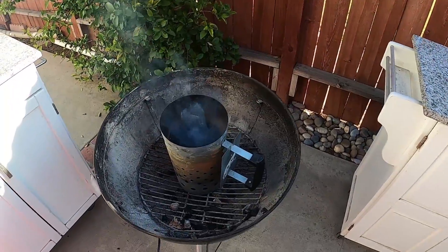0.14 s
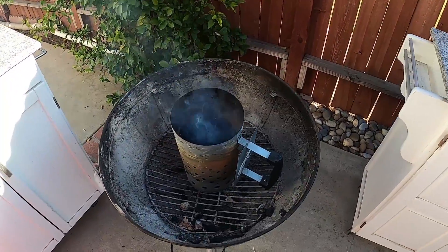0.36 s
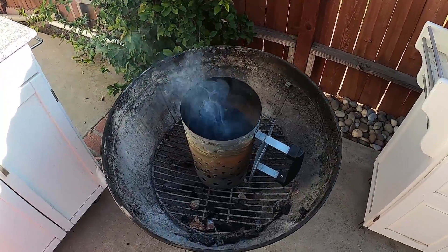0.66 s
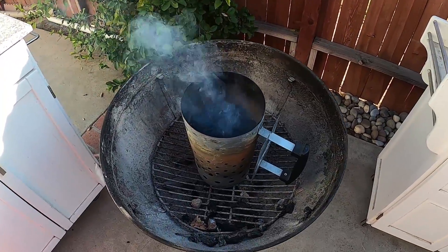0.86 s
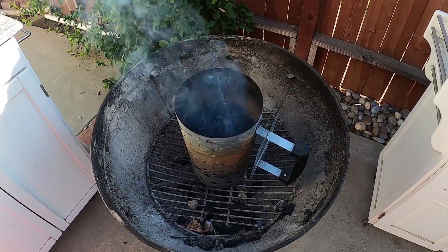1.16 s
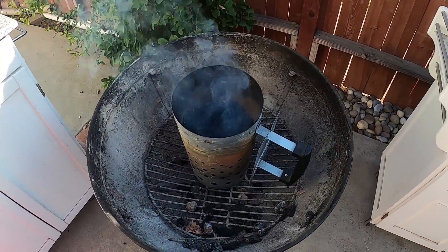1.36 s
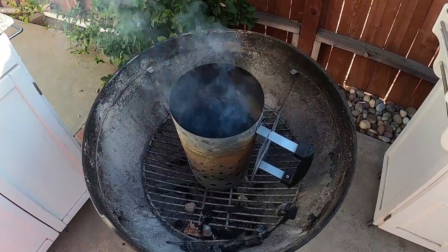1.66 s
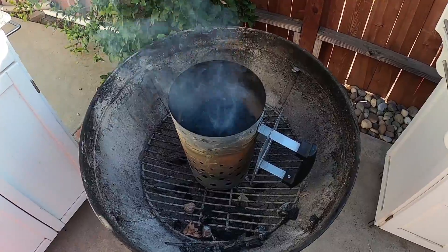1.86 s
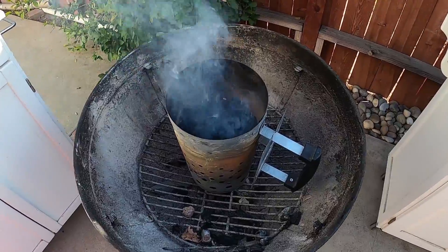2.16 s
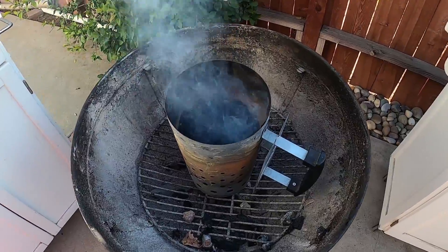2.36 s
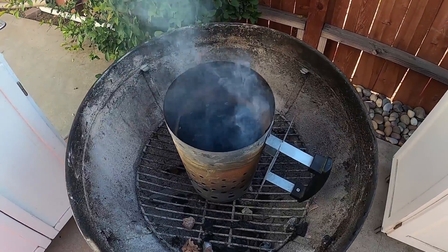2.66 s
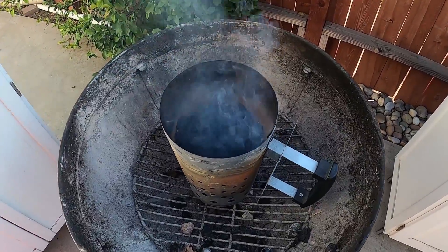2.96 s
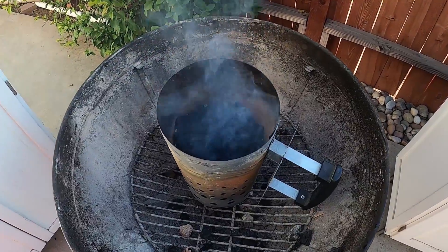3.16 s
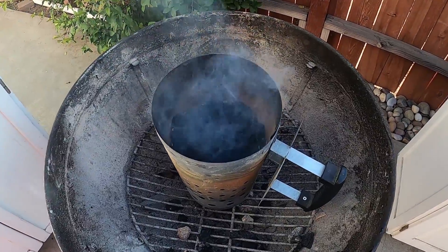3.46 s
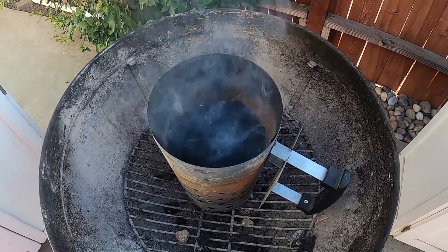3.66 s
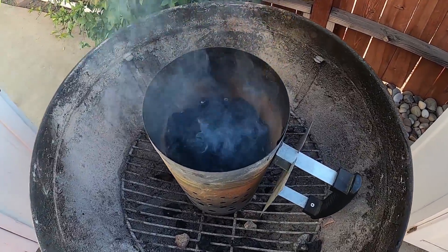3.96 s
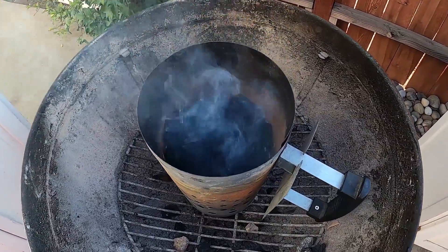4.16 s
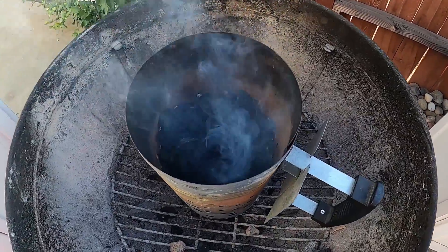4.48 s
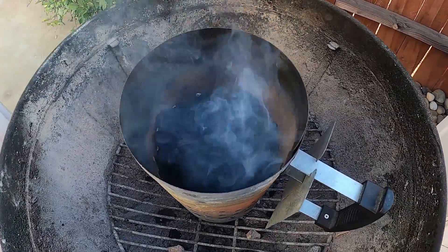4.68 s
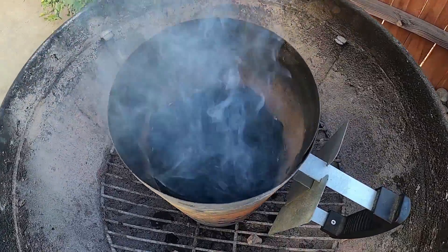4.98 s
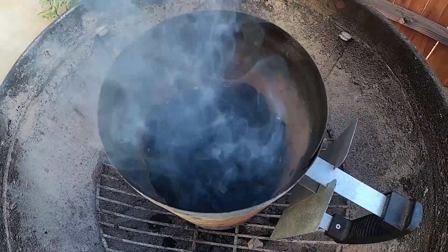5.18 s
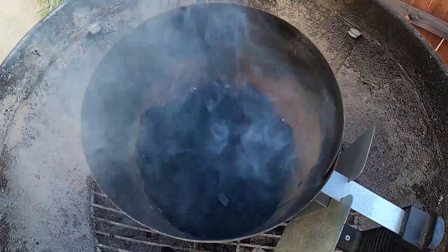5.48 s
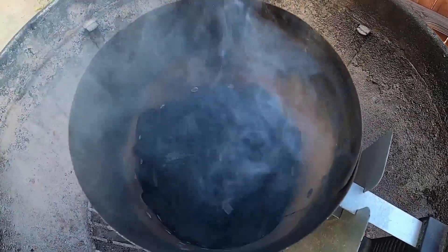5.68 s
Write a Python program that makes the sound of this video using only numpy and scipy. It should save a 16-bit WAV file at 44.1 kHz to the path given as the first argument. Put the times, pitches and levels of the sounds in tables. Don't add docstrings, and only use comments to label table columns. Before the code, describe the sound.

Outdoors on a small patio, a handheld stereo microphone approaches charcoal catching in a thin metal chimney. A steady low rumble lies underneath, with a deep distant machine hum of about 83 hertz that wavers, swelling around 2 seconds and again near 5.2. Far traffic is faint and fading. At 0 to 0.5 seconds shoe soles scrape, with a small knock. Sparse dry ticks follow, then the loudest snap, sharp and bright with a short metallic ring, at 1.3. Irregular cracks continue, clustering around 2.2 to 2.5, 3.0 to 3.8 and 4.4, among tiny ticks and faint fizz. Sliding lumps add gritty, tinny rattles, more noticeable after 4.2. A dull low tap at 4.7 and a harder one at 4.86 sound close by. More snaps come near 5.2, a grip click at 5.47 and a ringing slip at 5.7, as the soft air rush and fizz grow nearer.

```python
import sys
import numpy as np
from scipy import signal
from scipy.fft import rfft, irfft, next_fast_len
from scipy.io import wavfile
from scipy.ndimage import uniform_filter1d, map_coordinates

SR = 44100
rng = np.random.default_rng(int(sys.argv[2]) if len(sys.argv) > 2 else 0)


def to_wav(s):
    ch = np.atleast_2d(s).T
    pcm = np.round(np.clip(ch, -1, 1) * 32767)
    wavfile.write(sys.argv[1], SR, pcm.astype(np.int16))


def field_ratio(decibels):
    return 10 ** (np.asarray(decibels, dtype=float) / 20)


N = 257103

# (time [s], level [dB])
SHAFT_LEVEL = [(0, -39.5), (.9, -31), (1.5, -28.5), (2, -25), (2.6, -32.5), (3.5, -32), (4.3, -37),
               (4.7, -31), (5.2, -28.5), (5.83, -33.5)]
# (time [s], frequency [Hz])
SHAFT_PITCH = [(0, 82.3), (1.8, 82.8), (2.8, 83.44), (5.83, 84.01)]
# (time [s], shaft octave level [dB], slower machine's octave level [dB])
OCTAVE_LEVELS = [(0, -68, -52), (.9, -50.5, -54), (1.5, -44, -47.5), (2.1, -44.5, -53.5), (2.7, -46.5, -59),
                 (3.3, -60.5, -56.5), (5.83, -74, -52)]
# (silent beat [s], beat rate [1/s], loudest time [s], level [dB], fall [dB/s^2])
SLOWER_MACHINE = [
    (.59, 2.95, 0.46, -37.5, 7.5),
    (4.331, 5.15, 4.47, -38, 11),
]
# (frequency [Hz], level [dB], loudest time [s])
UPPER_LINES = [(377.4, -61, 3.04), (411, -69, 1.3), (464, -62.5, 5.4)]

# (frequency [Hz], density [dB per Hz])
RUMBLE_SPECTRUM = [(12, -45.5), (22, -6.5), (40, -1.5), (62, -2.5), (110, -4.5), (150, -8), (230, -15),
                   (270, -30.5), (400, -58.5)]
TRAFFIC_SPECTRUM = [(170, -30), (260, -2.5), (320, -2), (420, -5.5), (700, -13), (900, -29), (2000, -58)]
DRAUGHT_SPECTRUM = [(300, -36.5), (480, 7.5), (620, -1), (900, -0.5), (1300, -1), (1900, -11.5),
                    (2800, -24.5), (5000, -45.5)]
FIZZ_SPECTRUM = [(1200, -40), (2500, -6.5), (3700, -7), (5000, -3.5), (6500, -6), (7800, -4), (9200, -9.5),
                 (10500, -19.5), (13000, -59)]
# (frequency [Hz], correlation [0-1])
PORT_LIKENESS = [(30, 0.8), (70, 1), (240, 0.96), (490, 0.88), (990, 0.65), (1980, 0.3), (3990, 0.17),
                 (8040, 0.97)]
# (time [s], closeness [dB])
CLOSENESS = [
    (0, 0),
    (2.18, -3),
    (4.3, -0.5),
    (5.1, 4.5),
    (5.83, 7),
]
RUMBLE_DB, TRAFFIC_DB, DRAUGHT_DB, FIZZ_DB = -45, -53, -66, -74
RUMBLE_GROWS, FIZZ_GROWS = 0.3, 0.63
TRAFFIC_FADES_DB_PER_S = 0.95

# (time [s], peak level [dB], centre [Hz], decay t60 [s])
STEP_SCUFFS = [
    (.0, -50, 1800, 0.23),
    (.353, -46, 1860, 0.25),
    (.428, -50, 1310, 0.1),
    (.475, -63.5, 2500, 0.67),
    (4.166, -60, 2180, 0.095),
    (4.276, -53.5, 2000, 0.12),
    (4.681, -39, 1200, 0.0091),
    (4.859, -36, 1900, 0.0097),
    (5.466, -48, 3200, 0.0096),
]
# (time [s], frequency [Hz], level [dB], decay t60 [s])
STEP_KNOCKS = [
    (.356, 1096, -43, 0.048),
    (.4295, 670, -44.5, 0.027),
    (4.6812, 576, -27, .013),
    (4.859, 1240, -34, 0.0072),
]

# (time [s], peak level [dB], decay t60 [s])
LUMP_SLIPS = [(.3548, -45.5, 0.2), (.427, -60, 0.078), (.4749, -65, 0.08), (1.1138, -62, 0.063),
              (1.2839, -58, 0.37), (1.3914, -62, 0.052), (1.5832, -64, 0.057), (1.684, -72, 0.044),
              (1.8065, -58, 0.041), (1.8388, -67, .084), (2.1496, -60, 0.11), (2.64, -63, 0.073),
              (2.8541, -64, 0.055), (2.9622, -60.5, 0.059), (3.0143, -66, 0.034), (3.1628, -62, 0.065),
              (3.3047, -61.5, 0.075), (3.4959, -64, 0.23), (4.1663, -57.5, 0.11), (4.2746, -53.5, 0.25),
              (4.5526, -60, 0.11), (4.5761, -58, 0.3), (4.7168, -64, 0.37), (4.8102, -52, 0.22),
              (4.8803, -62.5, 0.19), (4.9749, -55, .14), (5.0699, -58.5, 0.12), (5.5928, -55.5, 0.18),
              (5.6915, -50, 0.099)]
# (frequency [Hz], level over the slip [dB], decay t60 [s])
WALL_MODES = [(3480, -14.5, 0.046), (4050, -15.5, 0.077), (4900, -10, 0.11), (5770, -6, 0.044),
              (7050, -6, .07), (8300, -4.5, .07), (9850, -8.5, 0.1), (10900, -8.5, 0.049)]
SLIP_HZ, MODE_SCATTER_DB, MODE_SPREAD_S = 6160, 2, 0.0083

# (time [s], crack level [dB], rim ring level [dB], shard [Hz], shard level [dB])
SHARP_SNAPS = [(0.3145, -54, -56, 6700, -47), (1.2218, -58, -45, 6500, -66), (1.2945, -28, -36, 4830, -25),
               (1.3271, -44, -35, 5800, -52.5), (1.5569, -42.5, -51, 5300, -36),
               (1.956, -52, -55, 7150, -48), (2.1388, -46, -58, 6960, -54), (2.1982, -45, -66, 6470, -50.5),
               (2.2093, -44.5, -58, 5550, -45), (2.2599, -54, -80, 4230, -46),
               (2.474, -41.5, -35.5, 9200, -49), (2.5565, -60, -45.5, 7000, -74),
               (3.0306, -39.5, -37, 5840, -54), (3.1145, -47.5, -43, 6480, -63),
               (3.4451, -49.5, -64, 6760, -55), (3.644, -42.5, -39, 6070, -38),
               (3.776, -40, -37.5, 6130, -40), (4.189, -44.5, -65, 5400, -51),
               (4.4022, -36, -49, 5360, -44.5), (4.42, -56, -50, 7000, -66),
               (4.8324, -41.5, -42.5, 6940, -44), (5.1588, -41.5, -34, 3520, -54),
               (5.1927, -53, -46, 7110, -60), (5.2062, -41, -58, 4800, -49)]
SNAP_HZ, SNAP_T60, RIM_HZ, RIM_T60, SHARD_T60 = 7000, 0.02, 7750, 0.025, 0.016
# (time [s], peak level [dB], shard [Hz])
SMALL_SPLITS = [(0.2067, -50, 6830), (0.4983, -53, 5160), (0.516, -47, 5300), (0.5697, -55, 5150),
                (0.5886, -50, 7800), (0.7013, -58, 6750), (0.8034, -66, 3610), (0.916, -59, 7700),
                (1.043, -55, 7740), (1.0765, -54, 3740), (1.1984, -61, 4330), (1.2084, -49, 7670),
                (1.4526, -53, 5810), (1.498, -54, 5350), (1.713, -61, 3540), (1.994, -64, 3540),
                (2.8768, -65, 3600), (2.9118, -57, 6110), (3.2644, -54, 6600), (3.3513, -51.5, 5460),
                (3.6062, -57.5, 3600), (3.9188, -50, 5850), (3.941, -51, 5460), (4.6796, -52, 3720),
                (5.3073, -51, 7000), (5.342, -50, 7000), (5.415, -56.5, 3500), (5.465, -49.5, 4300),
                (5.5413, -52, 7860), (5.756, -54, 4940)]
SMALL_HZ, SMALL_T60, SMALL_CRACK_DB, SMALL_RING_DB = 6500, 0.018, 0, -6.5
# (time [s], frequency [Hz], level [dB], decay t60 [s])
CLEAR_RINGS = [(.3548, 6140, -41.5, .1), (.3612, 3600, -43, 0.017), (.3687, 5000, -42.5, 0.086),
               (1.2943, 2920, -48.5, 0.02), (1.2985, 4100, -49, 0.15), (1.301, 7330, -49, 0.068),
               (1.4148, 7900, -62.5, 0.15), (1.807, 3450, -59, .09), (1.8065, 8430, -51, 0.11),
               (1.8388, 8600, -52.5, 0.14), (1.9931, 9860, -48, 0.025), (3.165, 3600, -61, 0.039),
               (2.3801, 4770, -60.5, 0.14), (2.9119, 6100, -57, 0.041), (3.1254, 6480, -49.5, 0.071),
               (3.128, 9820, -53, 0.076), (3.1628, 8560, -51, 0.096), (3.237, 3800, -58, 0.044),
               (3.3047, 8230, -51, 0.047), (3.4451, 5960, -46.5, 0.096), (3.646, 4050, -51.5, 0.16),
               (3.776, 7000, -37, .02), (4.2746, 3750, -45, 0.18), (4.2746, 8460, -48.5, 0.13),
               (4.2815, 5000, -53, .3), (4.7612, 5960, -61, .36), (4.8854, 3980, -53, 0.055),
               (4.5831, 4900, -58.5, 0.3), (5.6915, 3330, -54, 0.095), (5.6915, 8020, -38.5, 0.081)]
SPIKE_DB, SPIKE_HZ = -13.5, 12660

# (frequency [Hz], gain [dB])
MIC_RESPONSE = [(20, 1), (7800, -1.5), (8600, -7), (9300, -8.5), (11000, -8.5), (13000, -8), (15500, -33),
                (20000, -70)]
# (frequency [Hz], phase [rad])
PORT_LAG = [(100, 0.021), (500, 0.44), (1000, 0.3), (2000, 1), (4300, 0.99), (6600, 1.3), (8200, 1.2)]
LEFT_DB = 0.5


def unit(x):
    return x / np.sqrt(np.mean(x ** 2) + 1e-20)


def along(points, hz):
    f, v = np.transpose(points)
    return np.interp(np.log(hz + 1), np.log(f + 1), v)


def curves(rows):
    s, *columns = np.transpose(rows)
    return [np.interp(np.arange(N) / SR, s, column) for column in columns]


def wobble(rate):
    coarse = np.arange(0, N + 64, 64)
    knots = rng.standard_normal(int(N * rate / SR) + 9)
    return np.interp(np.arange(N), coarse, map_coordinates(knots, [coarse * rate / SR]))


def filtered(x, response):
    m = next_fast_len(x.shape[-1] + 1024)
    spectrum = rfft(x, m) * response(np.fft.rfftfreq(m, 1 / SR))
    return irfft(spectrum, m)[..., :x.shape[-1]]


def add(out, s, sound):
    part = out[:, max(round(s * SR), 0):][:, :sound.shape[1]]
    part += sound[:, :part.shape[1]]


def rush(spectrum, patchy_db):
    z = signal.stft(rng.standard_normal((2, N + 512)), nperseg=512)[2]
    patches = uniform_filter1d(rng.standard_normal(z.shape[1:]), size=7, axis=0)
    patches = uniform_filter1d(patches, size=5, axis=1)
    pair = signal.istft(z * field_ratio(patchy_db * unit(patches)), nperseg=512)[1][:, :N]

    def mid_side(hz):
        angle = np.arccos(np.clip(along(PORT_LIKENESS, hz), -1, 1)) / 2
        return field_ratio(along(spectrum, hz)) * [np.cos(angle), np.sin(angle)]

    mid, side = filtered(pair, mid_side)
    return unit(np.array([mid + side, mid - side]))


def bursts(rows, octaves, apart, attack, size=SR // 4):
    out = np.zeros((2, N))
    for s, db, hz, t60 in rows:
        draws = rng.standard_normal((3, size))
        t = np.arange(min(int(max(t60, .01) * SR), size)) / SR
        shared, left, right = draws[:, :len(t)]
        pair = np.array([shared + apart * left, shared + apart * right])
        noise = unit(filtered(pair, lambda f: np.exp(-(np.log2((f + 1) / hz) / octaves) ** 2 / 2)))
        lumps_db = 3.1 * np.interp(t * 250, np.arange(80), draws[0, -80:])
        fall = field_ratio(db + lumps_db - 60 * t / max(t60, .005))
        add(out, s, noise * fall * (1 - np.exp(-t / attack)))
    return out


def rings(rows, rough_db, turn):
    out = np.zeros((2, N))
    for s, hz, db, t60 in rows:
        knots = rng.standard_normal(128)
        t = np.arange(int(np.clip(t60, .01, .2) * SR)) / SR
        flutter_db = rough_db * np.interp(t * 300, np.arange(64), knots[:64])
        drift = 0.27 * rough_db * np.interp(t * 300, np.arange(60), np.cumsum(knots[64:124]))
        phase = 2 * np.pi * hz * t + drift + turn * knots[-1] * np.array([[-.5], [.5]])
        twin = field_ratio(-4) * np.sin(phase + 2 * np.pi * 130 * knots[-3] * t)
        pan_db = 0.35 * knots[-2] * np.array([[1], [-1]])
        fall = field_ratio(db + flutter_db - 60 * t / max(t60, .005) + pan_db)
        add(out, s, fall * (1 - np.exp(-t / 0.00076)) * (np.sin(phase) + twin))
    return out


def hum():
    octave_db, slower_octave_db = curves(OCTAVE_LEVELS)
    phase = 2 * np.pi * np.cumsum(curves(SHAFT_PITCH)[0] + 0.637 * wobble(6)) / SR
    t = np.arange(N) / SR
    tone = field_ratio(curves(SHAFT_LEVEL)[0] + 2.0 + 0.91 * wobble(35)) * np.sin(phase)
    tone += field_ratio(octave_db + 2.5) * np.sin(2 * phase)
    halves = (t < t.mean(), t >= t.mean())
    for (silent, beat, loudest, db, fall), here in zip(SLOWER_MACHINE, halves):
        slower = phase - 2 * np.pi * beat * (t - silent)
        tone -= field_ratio(db + 0.5 - fall * (t - loudest) ** 2) * np.sin(slower)
        tone += here * field_ratio(slower_octave_db + 5.0) * np.sin(2 * slower)
    for hz, db, loudest in UPPER_LINES:
        size = field_ratio(db - 2.3 * (t - loudest) ** 2 + 2.4 * wobble(3.9))
        tone += size * np.sin(2 * np.pi * hz * t + 1.1 * wobble(7))
    return np.array([tone, tone])


def rumble(near_db):
    level_db = RUMBLE_DB + RUMBLE_GROWS * near_db + 6.5 + 0.3 * wobble(2.3)
    return field_ratio(level_db) * rush(RUMBLE_SPECTRUM, patchy_db=1.44)


def traffic():
    level_db = TRAFFIC_DB - TRAFFIC_FADES_DB_PER_S * np.arange(N) / SR + 1.2 * wobble(4.0)
    return field_ratio(level_db) * rush(TRAFFIC_SPECTRUM, patchy_db=1.1)


def draught(near_db):
    level_db = DRAUGHT_DB + near_db + 4 + 0.49 * wobble(6.3)
    return field_ratio(level_db) * rush(DRAUGHT_SPECTRUM, patchy_db=1.37)


def fizz(fizz_db):
    return field_ratio(fizz_db + 3.0 + 1.8 * wobble(11)) * rush(FIZZ_SPECTRUM, patchy_db=4.5)


def footsteps():
    scuffs = bursts(STEP_SCUFFS, octaves=0.95, apart=0.34, attack=0.0011)
    return scuffs + rings(STEP_KNOCKS, rough_db=1.5, turn=0.57)


def ticks(fizz_db, count):
    at, pitch, life, size = rng.random((count, 4)).T
    s, hz = at * N / SR, 3800 * 2.3 ** pitch
    db = np.interp(at, np.arange(N) / N, fizz_db) - 3.5 * np.log(1 - .97 * size) - 3.5
    crack_rows = np.transpose([s, db + 8.0, hz, 0.0043 + 0 * s])
    ring_rows = np.transpose([s, hz, db + 4.5, 0.005 * 6 ** life])
    cracks = bursts(crack_rows, octaves=0.44, apart=0.6, attack=0.00057, size=900)
    return cracks + rings(ring_rows, rough_db=6, turn=0.8)


def slips():
    rows = [(s, db - 2, SLIP_HZ, t60) for s, db, t60 in LUMP_SLIPS]
    return bursts(rows, octaves=.5, apart=0.52, attack=0.002)


def metal():
    struck = []
    for s, _, rim_db, shard_hz, shard_db in SHARP_SNAPS:
        struck += [(s, RIM_HZ, rim_db, RIM_T60), (s, shard_hz, shard_db, SHARD_T60)]
    struck += [(s, hz, db + SMALL_RING_DB, SHARD_T60) for s, db, hz in SMALL_SPLITS]
    stirred = []
    for s, db, _ in LUMP_SLIPS:
        for hz, over_db, t60 in WALL_MODES:
            late, detune, luck = rng.standard_normal(3)
            level_db = db + over_db + MODE_SCATTER_DB * luck
            stirred.append((s + MODE_SPREAD_S * abs(late), hz * (1 + 0.018 * detune), level_db, t60))
    out = rings(struck, rough_db=3.0, turn=0.24)
    out += rings(CLEAR_RINGS, rough_db=3.5, turn=0.36)
    return out + rings(stirred, rough_db=5.0, turn=0.46)


def split_rows():
    sharp = [(s, db, SNAP_HZ, SNAP_T60) for s, db, *_ in SHARP_SNAPS]
    return sharp + [(s, db + SMALL_CRACK_DB, SMALL_HZ, SMALL_T60) for s, db, _ in SMALL_SPLITS]


def onset_spikes():
    rows = [(s, db + SPIKE_DB, SPIKE_HZ, .015) for s, db, *_ in split_rows()]
    rows += [(s, db + SPIKE_DB - 10, SPIKE_HZ, .03) for s, db, _ in LUMP_SLIPS]
    return bursts(rows, octaves=0.22, apart=0.96, attack=0.00025, size=1400)


def splits():
    return field_ratio(-2.5) * bursts(split_rows(), octaves=0.46, apart=0.59, attack=0.00075)


def patio(x):
    t = np.arange(SR // 6) / SR
    tail = rng.standard_normal((2, len(t))) * field_ratio(-60 * t / 0.23) * (t > .003)
    return signal.fftconvolve(x, tail / np.linalg.norm(tail[0]), axes=1)[:, :N]


def scene():
    near_db, = curves(CLOSENESS)
    fizz_db = FIZZ_DB + FIZZ_GROWS * near_db
    background = hum() + rumble(near_db) + traffic() + draught(near_db) + fizz(fizz_db)
    fire = ticks(fizz_db, count=520) + slips() + metal() + onset_spikes() + splits()
    close = footsteps() + fire
    return close + field_ratio(-14.0) * patio(close) + background * field_ratio([[LEFT_DB], [-LEFT_DB]])


def top_cut(x):
    return signal.sosfilt(signal.butter(12, 15500, fs=SR, output="sos"), x)


def record(dry):
    def ports(hz):
        return field_ratio(along(MIC_RESPONSE, hz)) * np.exp(.5j * along(PORT_LAG, hz) * [[-1], [1]])

    mix = filtered(dry, ports)
    return top_cut(mix)


dry = scene()
out = record(dry)
to_wav(out)
```